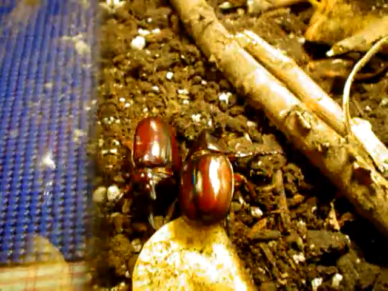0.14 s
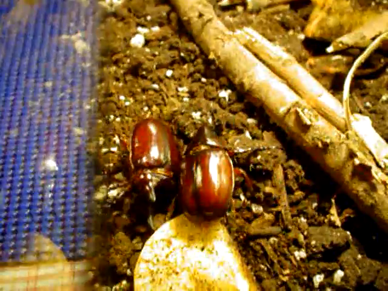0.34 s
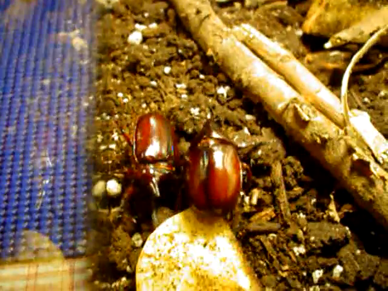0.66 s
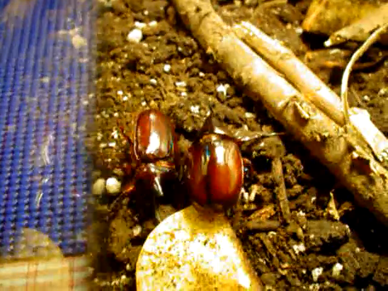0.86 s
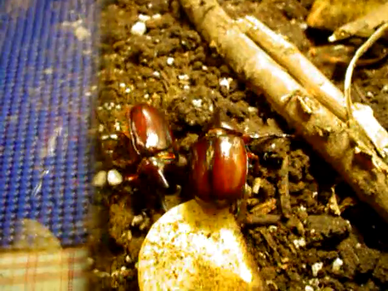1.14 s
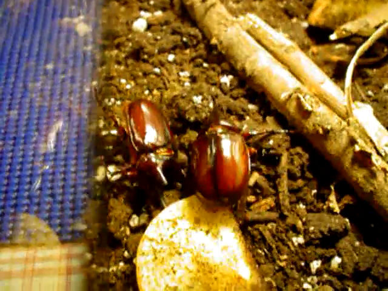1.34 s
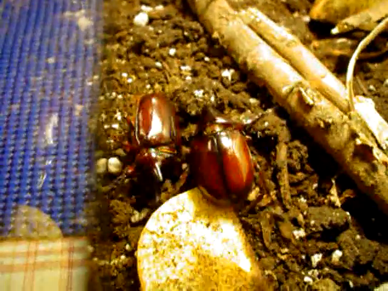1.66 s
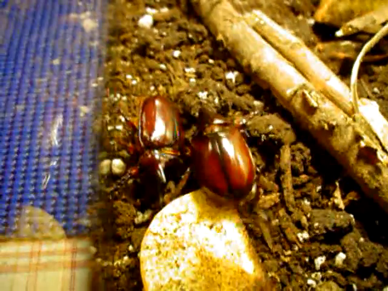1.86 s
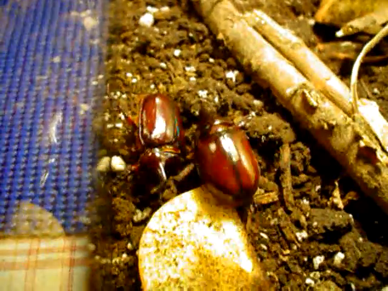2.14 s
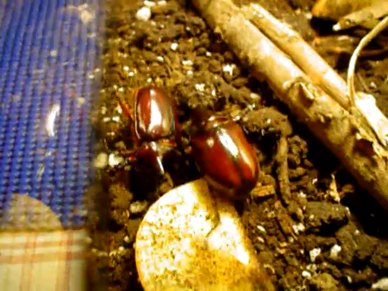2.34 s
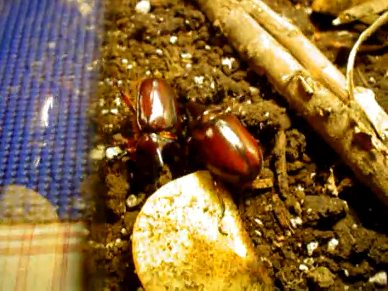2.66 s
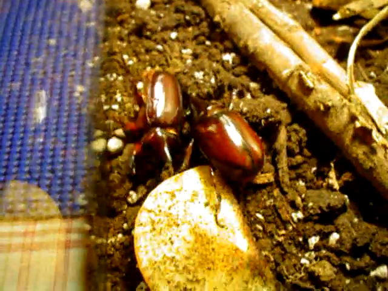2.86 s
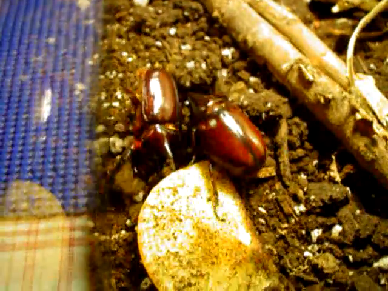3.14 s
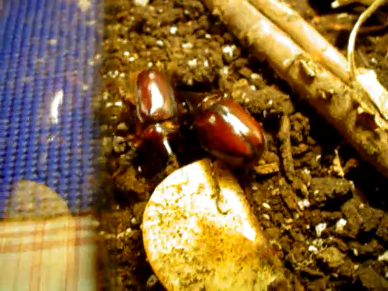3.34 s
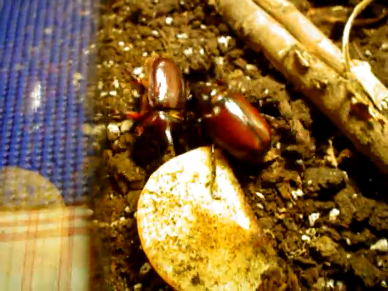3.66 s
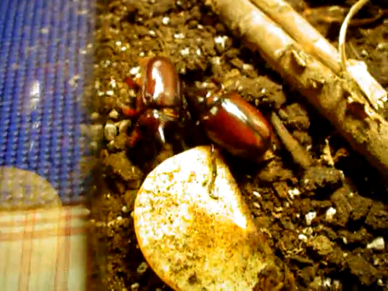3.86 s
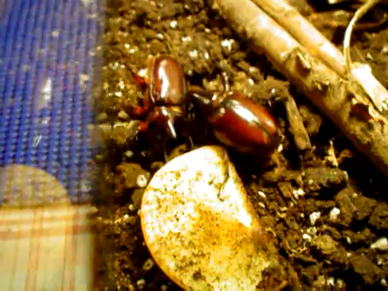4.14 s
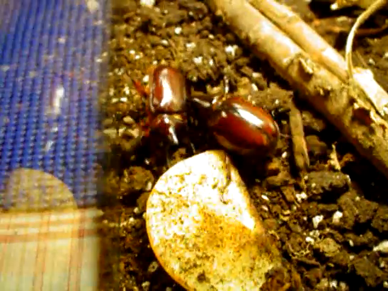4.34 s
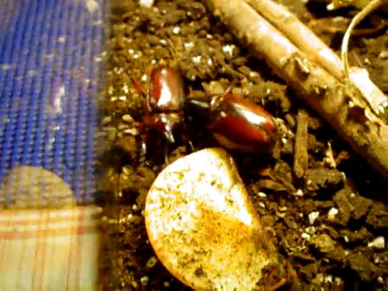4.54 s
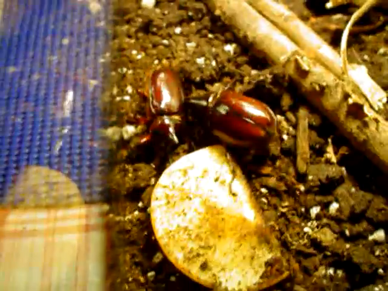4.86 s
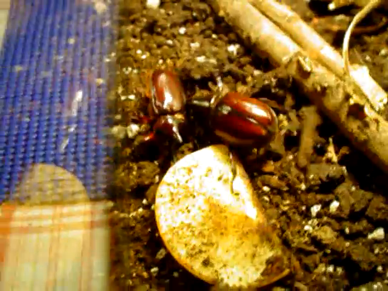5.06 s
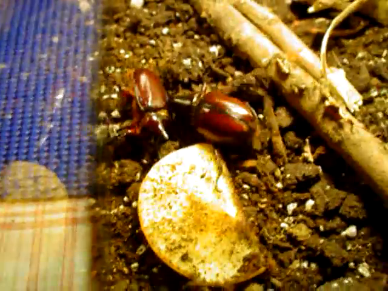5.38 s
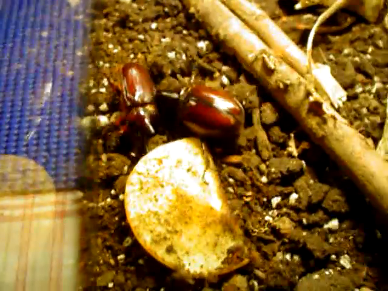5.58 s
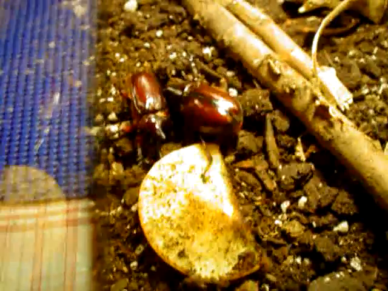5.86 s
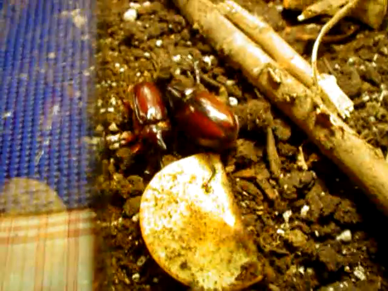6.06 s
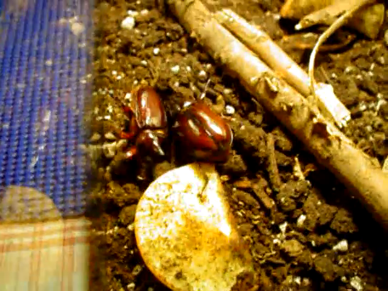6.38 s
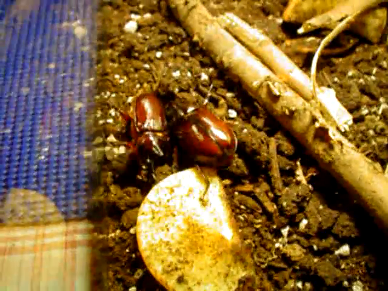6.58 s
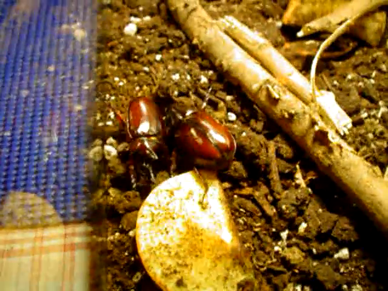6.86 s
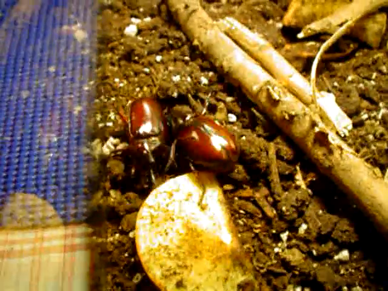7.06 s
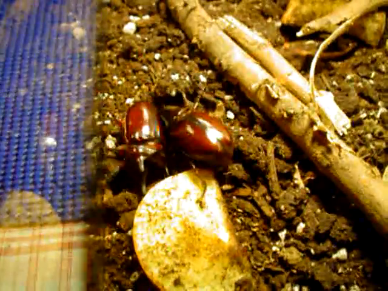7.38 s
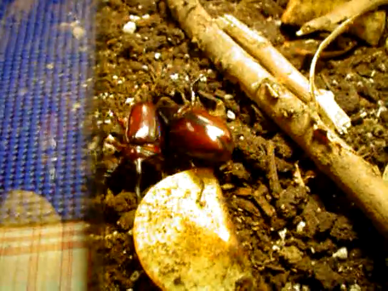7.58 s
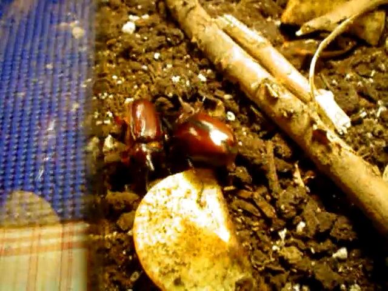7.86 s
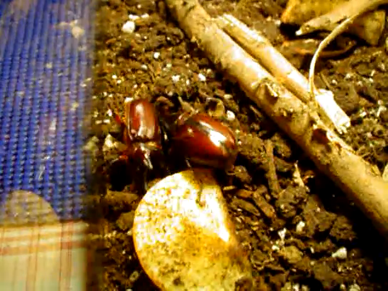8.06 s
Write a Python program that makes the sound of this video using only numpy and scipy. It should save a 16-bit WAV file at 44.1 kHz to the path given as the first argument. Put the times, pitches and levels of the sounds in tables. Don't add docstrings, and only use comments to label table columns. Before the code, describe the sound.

A steady mains hum, thin whine and hiss lie behind sharp, dry insect noises. Woody cracks, dull knocks and tiny ticks come first, followed by low thuds and rubbing from the tank. Isolated snaps continue, another bout of wall thuds and dragging follows, and finally a flurry of bright gritty leg rasps. Everything is close and slightly rough, with treble dropping out around the bursts and the hardest cracks overloading.

```python
import sys
import numpy as np
from scipy import signal
from scipy.fft import rfft, irfft, next_fast_len
from scipy.io import wavfile
from scipy.ndimage import uniform_filter1d, map_coordinates

SR = 44100
rng = np.random.default_rng(int(sys.argv[2]) if len(sys.argv) > 2 else 0)


def how_loud(loudness_db):
    steps = np.asarray(loudness_db, float) / 20
    return 10 ** steps


def store_pcm(level_fs):
    pcm = np.round(np.clip(level_fs, -1, 1) * 32767).astype(np.int16)
    wavfile.write(sys.argv[1], SR, np.atleast_2d(pcm).T)


N = 362502
WHINE_HZ, WHINE_DB = 8092, -70
DULL_EDGE_DB, DULL_SHELL_HZ = -13.5, 2640


def along(points, hz):
    f, v = np.transpose(points)
    return np.interp(np.log(hz + 1), np.log(f + 1), v)


def unit(x):
    return x / np.sqrt(np.mean(x ** 2) + 1e-20)


def noise(gain, n=N):
    m = next_fast_len(n)
    spectrum = rfft(rng.standard_normal(m)) * gain(np.fft.rfftfreq(m, 1 / SR))
    return unit(irfft(spectrum, m)[:n])


def gains(span):
    return how_loud(np.interp(np.arange(N) / SR, *np.transpose(span), -150, -150))


def ring(hz, db, t60, attack_s, length_s, phase=0, hold=0):
    t = np.arange(int(length_s * SR))[:, None] / SR
    fall = 60 * (t / t60) ** (1 + hold)
    attack = 1 - np.exp(-t / attack_s)
    return np.sum(how_loud(db - fall) * attack * np.sin(2 * np.pi * hz * t + phase), 1)


def add(out, s, x):
    i = round(s * SR)
    out[i:i + len(x)] += x[:N - i]


def room():
    # (frequency [Hz], width [Hz], rms level [dB])
    orders = [(121.3, 3.9, -54.5), (139, 24, -57.5), (180, 12.3, -43), (200.2, 14, -49.5),
              (233.7, 17, -42.5), (302.5, 4.7, -56), (379.3, 8.4, -59.5), (423.4, 1.7, -60.5),
              (481.7, 18, -64), (1140, 4.4, -68.5), (1199, 3.6, -68), (1965, 36, -71), (2000, 25, -71),
              (2440, 10, -66.5), (2427, 250, -63.5), (4400, 200, -69), (WHINE_HZ, 3.3, WHINE_DB),
              (WHINE_HZ, 170, -69.5)]
    # (frequency [Hz], density [dB per Hz])
    air_colour = [(15, -69), (25, -42.5), (70, -24), (194, -2.5), (243, -3.5), (338, -9), (435, -14.5),
                  (560, -24.5), (839, -15.5), (1880, -27.5), (2420, -24.5), (6330, -34), (8360, -35.5),
                  (9730, -39), (10500, -45), (13600, -89), (22000, -120)]
    air_db, steady = -44.5, 0.3
    t = np.arange(N) / SR

    def order(centre, width):
        band = noise(lambda f: 1 / np.hypot(1, ((f - centre) / width * 2) ** 2))
        tone = np.sin(2 * np.pi * (centre * t + rng.random()))
        return band + steady * 20 / (20 + width) * tone

    hum = sum(how_loud(db) * order(centre, width) for centre, width, db in orders)
    z = signal.stft(noise(lambda f: how_loud(along(air_colour, f))), nperseg=512)[2]
    patches = uniform_filter1d(rng.standard_normal(z.shape), size=8, axis=0)
    patches = unit(uniform_filter1d(patches, size=8, axis=1))
    hiss = signal.istft(z * how_loud(1.7 * patches), nperseg=512)[1][:N]
    return hum + how_loud(air_db) * unit(hiss)


def strike(out, s, db, wood_hz, wood_db, edge_db, shell_hz):
    count = 90
    t = np.arange(SR // 8) / SR
    u = rng.random((3, count))
    crowd_hz = 600 + 9600 * ((np.arange(count) + u[0]) / count) ** 1.6
    colour = [(0.43 * wood_hz, wood_db - 18.5), (wood_hz, wood_db - 6.5), (1600, wood_db / 2 - 11),
              (shell_hz + 1, -10), (7500, edge_db - 2.0)]
    hz = np.r_[wood_hz, shell_hz, crowd_hz]
    level = np.r_[wood_db + 5.5, -1, along(colour, crowd_hz) - 8 * u[1]]
    t60 = (0.035 + 0.00017 * db) * (hz / 1000) ** -.6 * np.r_[.35, .45, np.full(count, 1.15)]
    phase, hold = np.r_[0, 0, 4.4 * u[2]], np.r_[.8, .4, np.zeros(count)]
    snap = ring(hz, level, t60, attack_s=0.0002, length_s=.07, phase=phase, hold=hold)
    add(out, s + .0006, how_loud(db - 5.0) * snap)

    tail_db, tail_t60_s, tail_top_hz = -20.5, 0.1, 1250
    flutter = map_coordinates(rng.standard_normal(60), [t * 400])
    ragged = how_loud(tail_db - 60 * t / tail_t60_s + 5.4 * flutter)
    answer = noise(lambda f: (f / np.hypot(f, 500)) ** 2 / np.hypot(1, (f / tail_top_hz) ** 5), len(t))
    add(out, s + .003, how_loud(db + 1.5 * wood_db) * ragged * (1 - np.exp(-t / 0.00067)) * answer)

    creep = np.exp(-t / 0.0017) + how_loud(db - 6) * np.exp(-t / 0.018)
    add(out, s + 0.0012, how_loud(db + 0.94 * min(wood_db, 0) - 13.5) * creep)


def knocks():
    # (time [s], peak [dB], wood ring [Hz])
    bumps = [(0.04, -37.5, 1200), (0.149, -44, 890), (0.49, -36, 800), (0.528, -39, 800), (0.548, -41, 785),
             (0.572, -36, 780), (1.4365, -24, 770), (1.711, -34.5, 1240), (1.858, -51, 780),
             (2.1809, -24.5, 445), (2.182, -24, 925), (5.098, -34, 643), (5.3767, -20.5, 590),
             (5.6894, -29.5, 696), (5.6905, -35, 1280)]
    shell_db = -14.5
    out = np.zeros(N)
    for s, db, wood_hz in bumps:
        strike(out, s, db + shell_db, wood_hz, -shell_db, DULL_EDGE_DB, DULL_SHELL_HZ)
    return out


def rustle():
    # (middle [s], half length [s], level [dB])
    brushes = [
        (0.43, 0.27, -60.5),
        (1.754, 0.3, -55),
        (3.6, .3, -64),
        (6.698, 0.16, -57),
        (7.118, 0.26, -58),
    ]
    t = np.arange(N) / SR
    swell = sum(how_loud(db) * np.cos(np.pi / 2 * np.clip((t - s) / half, -1, 1)) for s, half, db in brushes)
    clumps = how_loud(7.9 * map_coordinates(rng.standard_normal(800), [t * 90]))
    colour = [(1000, -17), (4200, -9), (4900, 3.5), (7500, 1), (10000, -2.0)]
    return how_loud(-1.5) * swell * unit(clumps * noise(lambda f: how_loud(along(colour, f))))


def ticks():
    # (time [s], peak [dB], wood over peak [dB])
    touches = [(0.406, -32, -12), (0.436, -32, -2), (0.9018, -35.5, -13), (1.487, -29, -7),
               (2.4531, -31.5, -1), (2.7801, -39, -16), (2.79, -32, -2), (2.9773, -28.5, -14),
               (4.2977, -32.5, 0.5), (4.5825, -37, -22), (4.69, -37, -3), (4.8064, -34.5, -4),
               (6.4264, -34, -4.5), (7.2792, -37, -3.5), (7.3515, -30.5, -11), (7.4163, -35.5, -1),
               (7.7646, -36, -17), (8.1762, -32, -7)]
    wood_hz, scatter = 770, 0.1
    out = np.zeros(N)
    for s, db, wood_db in touches:
        a, b = np.exp(scatter * rng.standard_normal(2))
        strike(out, s, db, wood_hz * a, wood_db, DULL_EDGE_DB, DULL_SHELL_HZ * b)
    return out


def sway():
    return noise(lambda f: (f / 25) ** 2 / (1 + (f / 45) ** 5))


def drag():
    # (time [s], level [dB])
    pressure = [
        [(0.42, -73), (0.444, -40), (0.466, -64), (0.524, -52), (0.562, -39), (0.62, -73)],
        [(1.48, -76), (1.526, -45.5), (1.634, -64), (1.724, -45.5), (1.874, -45.5), (1.93, -73)],
        [(5.05, -62), (5.092, -59), (5.19, -54.5), (5.364, -48), (5.385, -40), (5.42, -43), (5.626, -45.5),
         (5.66, -50)],
    ]
    # (frequency [Hz], level [dB])
    rubbed = [
        [(480, 7), (780, 10), (1000, 0), (1300, 3)],
        [(380, 5.5), (490, -6), (775, 2.5), (960, -19), (1200, -15), (1500, -10)],
        [(400, -19), (580, 6), (750, -8), (1000, -3), (1250, -8)],
    ]
    rumble_db = [-11, 8, 11]
    push_db = [-30, -18, -29]
    rumble_floor_hz = 150
    slips = (rng.random(N) < 240 / SR) * rng.choice([-1, 1], N)
    slips = slips * how_loud(4.6 * rng.exponential(size=N).clip(0, 3))

    def shake(modes, t60, attack_s):
        x = signal.fftconvolve(slips, ring(*np.transpose(modes), t60, attack_s, length_s=.2))[:N]
        return x / np.sqrt(np.abs(uniform_filter1d(x ** 2, size=4000)) + 1e-9)

    rumble = shake([(176, -9), (228, -5), (310, -6.5)], t60=0.078, attack_s=0.009)
    rumble = signal.sosfilt(signal.butter(N=3, Wn=rumble_floor_hz, btype="high", fs=SR, output="sos"), rumble)
    air = sway()
    out = np.zeros(N)
    for span, modes, low_db, air_db in zip(pressure, rubbed, rumble_db, push_db):
        scrape = shake(modes, t60=0.029, attack_s=0.0006)
        out += gains(span) * (scrape + how_loud(low_db) * rumble + how_loud(air_db) * air)
    return out


def rasps():
    # (time [s], peak [dB], length [s], brightest [Hz])
    scrapes = [(0.433, -43.5, 0.018, 7110), (0.45, -43, 0.015, 6720), (1.5126, -33, 0.011, 8600),
               (2.261, -44.5, 0.018, 4910), (6.7924, -37, 0.015, 4760), (6.933, -40.5, 0.0047, 8490),
               (6.952, -45, 0.011, 4910), (6.99, -42.5, 0.01, 7150), (7.008, -40, .01, 7500),
               (7.3, -45, 0.017, 6000), (7.043, -33.5, 0.019, 7450), (7.064, -26.5, 0.0045, 4840),
               (7.08, -31, 0.021, 4840), (7.1053, -29.5, 0.0079, 4840), (7.128, -35, 0.01, 4920),
               (7.152, -38.5, 0.0081, 8100), (7.226, -31.5, 0.015, 5000), (7.255, -32, 0.0064, 7740),
               (7.265, -43, 0.012, 4890)]
    low_db, shell_edge_hz = -17, 4760
    colour = [(1000, low_db + 15.5), (4450, low_db + 1.5), (4800, -4), (10000, -5)]
    out, t = np.zeros(N), np.arange(2600) / SR
    for s, db, length, top_hz in scrapes:
        def gain(f):
            top = 0.91 / np.hypot(1, ((f - top_hz) / 350) ** 2)
            edge = 0.22 / np.hypot(1, ((f - shell_edge_hz) / 200) ** 2)
            return how_loud(along(colour, f)) + top + edge

        grit = how_loud(20 * uniform_filter1d(rng.standard_normal(len(t)), size=30))
        shape = (1 - np.exp(-t / 0.001)) * np.exp(-(t / max(length, .003)) ** 3)
        add(out, s, how_loud(db - 4.0) * shape * unit(grit * noise(gain, len(t))))
    return out


def snaps():
    # (time [s], peak [dB], wood ring [Hz], wood over peak [dB], edge over peak [dB])
    big = [
        (3.9017, -24.5, 940, -4.5, -17),
        (6.3598, -21, 770, -14.5, -34),
        (6.5266, -15, 760, -19.5, -28),
    ]
    # (time [s], peak [dB], wood ring [Hz], wood over peak [dB], edge over peak [dB])
    small = [
        (0.7142, -10, 1210, 3, -3.5),
        (1.4487, 1, 1108, -3, -14.5),
        (2.4299, -16, 1200, -10, -2.5),
        (2.9512, -29, 830, -8, -16),
        (3.3549, -4.5, 1020, -11.5, -11.5),
        (4.4472, -10.5, 687, -9, -25),
        (4.8596, -5.5, 1430, -15.5, -17),
        (5.5039, -19, 670, -23, -28),
        (6.0721, -24, 850, -24, -15.5),
    ]
    # (time [s], peak [dB], wood ring [Hz], wood over peak [dB], edge over peak [dB])
    claws = [
        (4.495, -14.5, 1160, -19.5, -17),
        (7.9004, -32, 895, 3, -1.5),
    ]
    out = np.zeros(N)
    for rows, shell_hz in [(big, 2350), (small, 2980), (claws, 6000)]:
        for row in rows:
            strike(out, *row, shell_hz)
    return out


def thuds(rows, upper_hz, usual_db, bright_db):
    # (frequency [Hz], level [dB])
    tank = [(113, -10), (176, -9.5), (228, -6.5), (310, -10), (490, -2), (590, -26), (775, 4), (950, -0.5),
            (1180, -1.5), (1450, -3)]
    upper_grows, upper_t60_s = 0.3, 0.055
    push_db, push_s = -58, 0.034
    out, push, t = np.zeros(N), np.zeros(N), np.arange(SR // 4) / SR
    hz, level = np.transpose(tank)
    upper = hz > 400
    for s, db, main_hz, t60 in rows:
        upper_db = usual_db + upper_grows * (db + 26.5) - db
        mix = level + np.where(upper, upper_db + bright_db, -6) + 2.0 * rng.standard_normal(len(hz))
        wall_t60 = np.where(upper, upper_t60_s, t60) * (hz / 400) ** -.35
        decay = np.r_[max(t60, .03), upper_t60_s, wall_t60]
        modes_hz, modes_db = np.r_[main_hz, upper_hz, hz], np.r_[0, upper_db, mix]
        blow = ring(modes_hz, modes_db, decay, attack_s=0.0033, length_s=.4, hold=0.32)
        add(out, s, how_loud(db + 0.5) * blow)
        add(push, s, how_loud(db + push_db) * t / push_s * np.exp(1 - t / push_s))
    return out + push * sway()


def floor_thuds():
    # (time [s], peak [dB], main ring [Hz], t60 [s])
    blows = [(1.351, -25.5, 155, 0.11), (1.392, -26, 218, .13), (1.616, -28.5, 160, 0.093),
             (1.68, -29, 150, 0.087), (1.711, -22, 157.3, 0.093), (1.733, -18.5, 163.6, 0.1),
             (1.799, -26, 217, .11), (1.858, -20.5, 171, 0.05), (2.182, -18, 174, 0.16),
             (2.214, -24.5, 225, 0.14)]
    return thuds(blows, upper_hz=461, usual_db=-35, bright_db=-7.5)


def wall_thuds():
    # (time [s], peak [dB], main ring [Hz], t60 [s])
    blows = [(2.324, -13, 223.6, 0.12), (2.981, -19, 222, 0.13), (5.102, -30.5, 234, 0.1),
             (5.163, -16, 232.4, 0.097), (5.29, -31, 182, 0.12), (5.344, -32, 173, .08),
             (5.378, -16, 288, 0.052), (5.431, -22, 173, 0.15), (5.529, -27, 300, 0.1),
             (5.588, -19, 243, 0.037)]
    return thuds(blows, upper_hz=618, usual_db=-36, bright_db=-14)


def scene():
    beetles = knocks() + rustle() + ticks() + rasps() + snaps()
    tank = drag() + floor_thuds() + wall_thuds()
    return (room() + beetles + tank)[None]


def starve(x, spread_db=-19, calm_db=2.5, need=2.3, per_octave=1.3, most_db=7):
    frame_s, frame_start_s, top_hz = 0.036, -0.002, 10020
    hz, t, z = signal.stft(x, SR, nperseg=512, noverlap=384)
    smear = how_loud(spread_db) * np.abs(z) * np.exp(2j * np.pi * rng.random(z.shape))
    z = (z + smear) * (hz < top_hz)[:, None]
    edges = np.unique(np.round(np.geomspace(5, 118, 24)).astype(int))
    band = np.searchsorted(edges, np.arange(len(hz)))
    power = np.array([np.mean(np.abs(z[band == b]) ** 2, 0) for b in range(len(edges))])
    level = 10 * np.log10(power + 1e-14)
    over = level - np.median(level, axis=1, keepdims=True)
    frame = np.floor((t - frame_start_s) / frame_s).astype(int)
    burst = np.zeros(frame.max() + 1)
    np.maximum.at(burst, frame, np.mean(over[-10:], axis=0))
    luck = .45 * rng.standard_normal((len(edges), len(burst)))
    short = 1.9 * (rng.random(len(burst)) < .3) * rng.random(len(burst))
    height = np.minimum(np.log2(hz[edges] / 5000), .5)[:, None]
    height = height - 99 * (hz[edges] < 750)[:, None]
    strain = np.maximum(np.sqrt(np.clip(burst - calm_db, 0, None)), short)
    hunger = strain - need + per_octave * height + luck
    keep = over > np.minimum(5 * hunger[:, frame] - 3, most_db)
    z = z * keep[np.minimum(band, len(edges) - 1)]
    return signal.istft(z, SR, nperseg=512, noverlap=384)[1][:N]


def top_cut(x):
    return signal.sosfilt(signal.butter(12, 16510, fs=SR, output="sos"), x)


def record(dry):
    capsule = dry / (1 + np.abs(dry / 1.05) ** 4) ** (1 / 4)
    x = starve(capsule[0])[None]
    x = x / (1 + np.abs(x / .73) ** 16) ** (1 / 16)
    return top_cut(x)


dry = scene()
out = record(dry)
store_pcm(out)
```